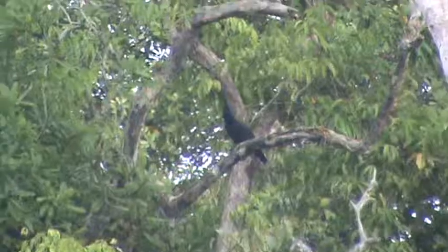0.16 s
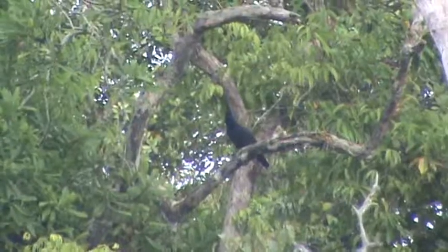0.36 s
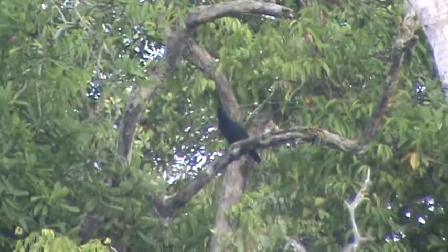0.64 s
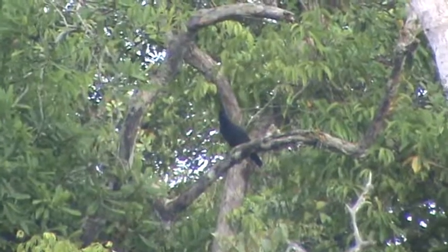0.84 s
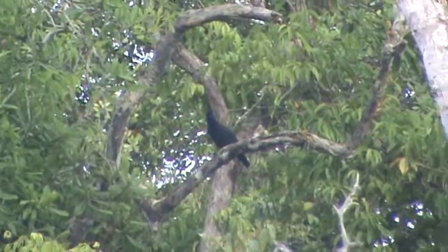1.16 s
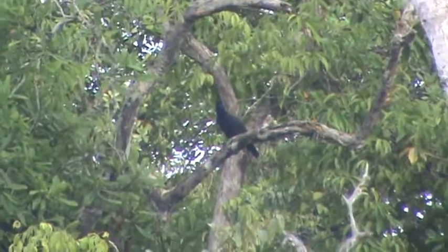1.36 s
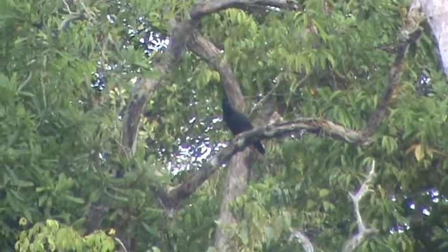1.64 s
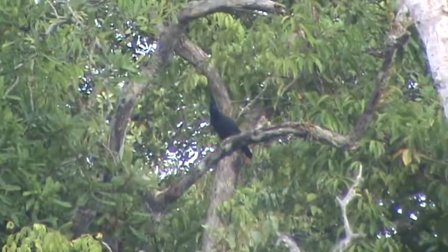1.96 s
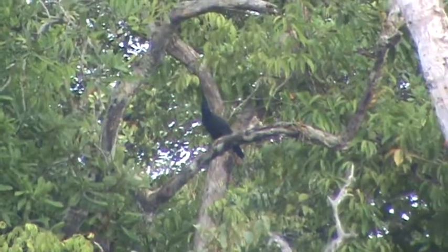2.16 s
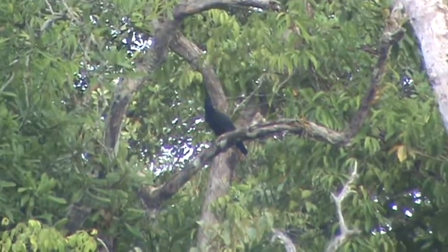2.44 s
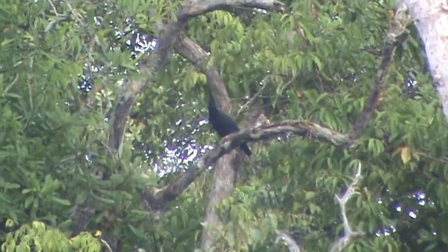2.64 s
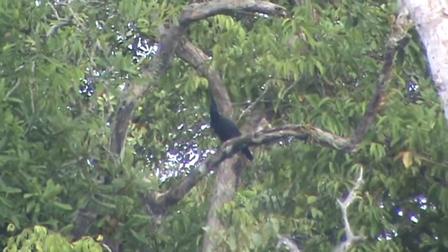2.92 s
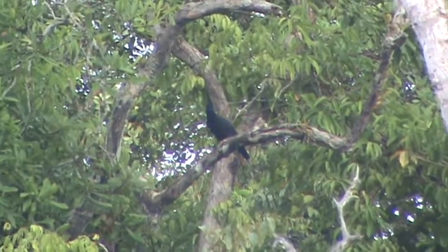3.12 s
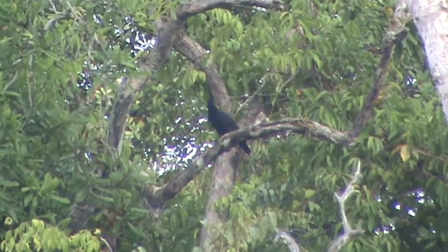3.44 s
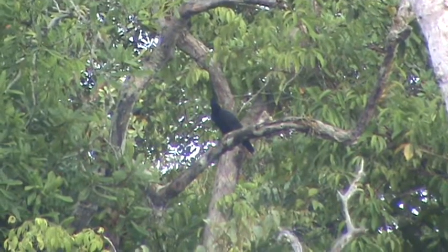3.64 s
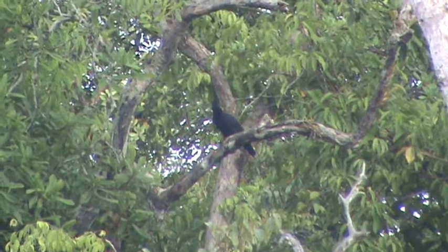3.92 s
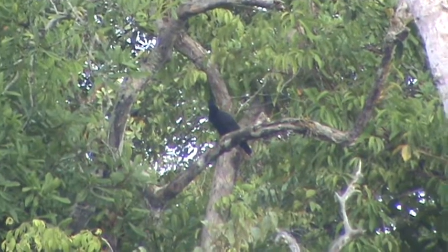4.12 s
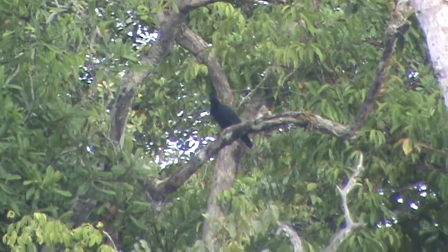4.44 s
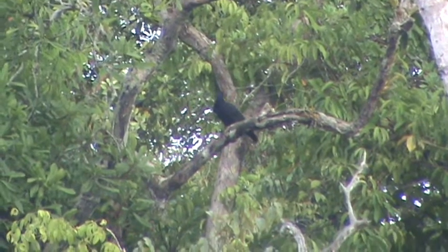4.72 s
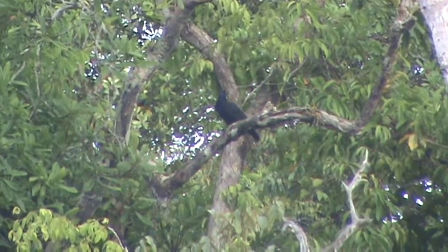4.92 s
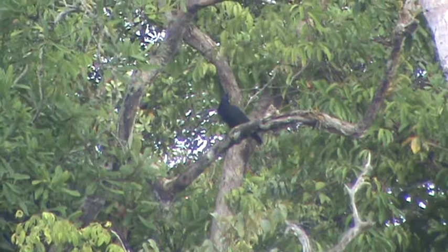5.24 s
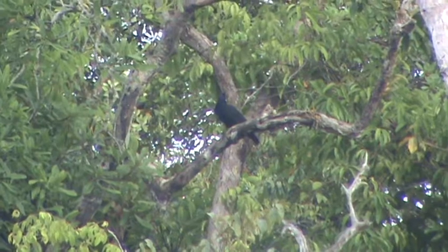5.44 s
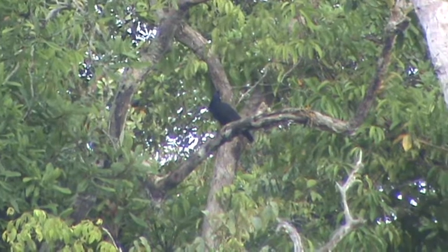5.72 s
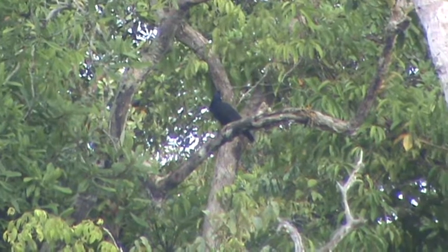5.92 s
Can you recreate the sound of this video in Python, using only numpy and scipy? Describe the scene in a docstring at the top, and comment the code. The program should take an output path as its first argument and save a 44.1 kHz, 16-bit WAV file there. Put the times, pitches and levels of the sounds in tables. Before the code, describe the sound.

Throughout about six seconds, a rainforest rings with a bright, steady cicada drone around five to seven kilohertz, swelling slightly. One cicada throbs about every 0.7 seconds; softer crickets and a low rasp lie beneath, with air hiss and a faint far engine hum. After a tiny silent start, the tail of a soft hoot is heard. Close dry twigs tick irregularly, with a stronger snap near 1.0, and leaves crunch at 1.3, 2.0 and 2.6, ending in a cluster of knocks around 2.8. Faint whistles slide far off. At about 2.7 to 3.4 a dove-like hoot climbs in stutters and falls clearly, overlapping a short frog trill at 2.9. A small twig click comes at 3.8. Small-bird chips begin at 3.1, grow frequent after 4.3, brightest near 5.0, and crowd the end. Another frog trill sounds at 5.4, and a new hoot rises from 5.7. Tree reverberation surrounds the distant voices.

```python
"""In a rainforest by day, on a stereo microphone: cicadas, crickets and a low rasp are trains of short rings,
with one cicada throbbing in repeated phrases. A dove-like bird hoots, a small bird chips, faint whistles slide
and a frog trills, all as gliding sines; trunks and leaves scatter these far voices as noise tails.
Close by, twigs tick as bundles of fading modes and leaves rustle as dense coloured crackles.
A far engine hums as wavering multiples of its shaft rate under the hiss of the air, which is shaped noise."""
import sys
import numpy as np
from scipy import signal
from scipy.fft import rfft, irfft, next_fast_len
from scipy.io import wavfile
from scipy.ndimage import uniform_filter1d

SR = 44100
rng = np.random.default_rng(int(sys.argv[2]) if len(sys.argv) > 2 else 0)


def transcribe(signal):
    """Save signal, clipped to [-1, 1], as a 16-bit WAV file at the path in sys.argv[1]."""
    frames = np.atleast_2d(signal).T
    limited = np.clip(frames, -1, 1)
    pcm = np.round(limited * 32767).astype(np.int16)
    wavfile.write(sys.argv[1], SR, pcm)


N = 267863
T = np.arange(N) / SR
M = next_fast_len(N)  # transform length

# far hiss of the air: (frequency [Hz], density [dB per Hz])
AIR_SPECTRUM = [(20, -80), (40, -91), (100, -78), (220, -86), (280, -93.5), (370, -88.5), (500, -92),
                (800, -86.5), (1450, -91.5), (1800, -94.5), (2300, -93), (3700, -100), (8000, -106),
                (10000, -105), (12500, -104), (16000, -107)]
# microphone ports in a diffuse field:
# (frequency [Hz], likeness [0-1], phase of left [rad], left minus right [dB])
MIC_PORTS = [(40, 0.94, 0.048, -0.5), (131.22, 1, -0.041, -1), (296, 0.6, -0.76, -0.5), (490, 0.6, -1.7, 0),
             (1052.3, 0.64, -2.2, -1.5), (1900, 0.34, -1.8382, -0.5), (3480, 0.3, -1.5, -0.5),
             (6200, 0.97, 0.225, -4), (9600, 0.72, -0.19, 1.5), (13100, 0.94, -0.4, 0.5)]
# far engine, with one row (2.65, near 70 Hz) adding a low tone between its multiples: (multiple of the shaft
# rate [1], # mean level [dB])
ENGINE_HARMONICS = [(1.5, -67), (2, -65), (2.65, -67), (3, -78.5), (4, -55.5), (5, -70.5), (6, -68.5),
                    (7, -73), (8, -68.5), (9, -65), (10, -80)]
# steady cicadas, near and far: (click rate [1/s], ring [Hz], pitch scatter [Hz], time to ring's peak [ms],
# phase roughness [rad], overtone [dB], level before the swell [dB], left minus right [dB])
CICADA_VOICES = [(73.47, 6520, 47.6, 1.75, 2.5164, -44.5, -46, 1),
                 (90.4, 6270, 29, 5.573, 1.3, -24, -55.5, 6.5),
                 (101, 6150, 51, 1.3, 2.899, -40, -53.5, 2.5), (111.9, 7000, 111.1, 1.04, 2.5, -40, -63, 1)]
# cicada chorus: (lowest ring [Hz], highest ring [Hz], mean click rate [1/s], pitch scatter [Hz],
# time to ring's peak [ms], level before the swell [dB], mean left minus right [dB])
CICADA_CHORUS = (5325, 5924, 105, 97, 1.25, -50, -4.5)
# slow swell of the steady cicadas and the chorus: (time [s], gain [dB])
CICADA_SWELL = [(0, -1), (2, -0.5), (6.07, 1)]
# phrases of the throbbing cicada: (first start [s], period [s], sung length [s], edge [s])
CICADA_PHRASE = (.4, .687, .48, .05)
# cricket phrases that rise in pitch:
# (first start [s], period [s], settled pitch [Hz], start below it [Hz], rise time [s], mean level [dB])
RISING_CRICKET = (.1, 1.2, 4270, 250, .25, -72)
# faint low insect rasping in uneven bursts: (click rate [1/s], ring [Hz], pitch scatter [Hz],
# time to ring's peak [ms], burst rate [1/s], burst depth [dB], mean level [dB])
RASPING_INSECT = (54.5, 1462, 59, 2.5, 14, 8, -78)
# low cricket, chirping evenly: (time [s], level before the beat [dB])
LOW_CRICKET = [(0, -74.5), (3, -81.5), (4, -68), (6.07, -69.5)]
# leaves stirring between steps: (time [s], level [dB], brightness [dB])
LEAF_STIR = [(0, -59, -4.5), (1.2, -59, -2.5), (2.5, -58, 1.5), (2.8, -57, -6), (2.95, -101, -3),
             (4.1, -59.5, -7.5), (6.07, -64.5, 6)]
# leaves crushed by a step: (start [s], hold [s], level [dB], starting brightness [dB])
LEAF_STEPS = [(1.332, 0.055, -47.5, -0.5), (2.031, 0.04428, -47.5, -8), (2.632, 0.011, -55.5, -16),
              (2.731, 0.01, -67, -18), (2.81, 0.02102, -49, -9.5), (2.831, .006, -51, 3),
              (3.77, .03, -69, 11.5)]
# colour of dry leaves: (frequency [Hz], relative response [dB])
LEAF_COLOUR = [(120, -19), (320, -6), (700, -10.5), (1500, -11.5), (3000, -13), (6000, -19.5),
               (10000, -23.5), (16000, -48.5)]
# twig ticks and knocks: (time [s], peak [dB], crack centre [Hz], body centre [Hz],
# body against crack [dB], left minus right [dB])
TWIG_TICKS = [(0.1086, -41, 1300, 500, -3, 0), (0.174, -32, 2251, 905.7, -1, -13),
              (0.1735, -42, 4800, 4200, -3, -6.5), (0.1775, -33.5, 1790, 800, 2, 19),
              (0.4214, -44.5, 2800, 500, -17, -2), (0.4352, -36.5, 2600, 900, 6, -6),
              (0.4918, -39, 2800, 1500, -1, -3.5), (0.794, -37, 2400, 800, 2, 5),
              (0.825, -41, 1958, 500, -4, -9), (0.9835, -27, 2230, 447, 4, 3),
              (1.0171, -36, 3380, 700, -3, -1.5), (1.0822, -40.5, 900, 500, -10, -2.4412),
              (1.4603, -37.5, 1400, 700, -1, -6), (1.628, -38, 2024, 612, -1, .1),
              (1.766, -45.5, 700, 300, 4, -3.5), (1.9674, -30, 1812, 301.1, -0.5, 2),
              (2.0492, -38, 1290, 500, -6, -5), (2.074, -42, 500, 260, -2, 0),
              (2.274, -39.5, 909, 450, 1, -5), (2.5807, -44.5, 1000, 400, -5, -4.5),
              (2.648, -44, 704, 400, 4, -5), (2.658, -40, 2400, 500, -20, 1),
              (2.67, -43.5, 2500, 500, -18, 1), (2.705, -46, 900, 447, 3, -5),
              (2.736, -44, 600, 300, 4, -2), (2.748, -44, 1100, 400, -4.5, -2),
              (2.756, -46, 500, 280, 4, -2), (2.8242, -38, 420, 300, 14, 0.5),
              (2.831, -38, 922.3, 354.2, 0, -2.5), (2.8414, -29.5, 3300, 230, -2.5, -6),
              (2.8442, -33.5, 2200, 815, -1, 10), (2.857, -40, 900, 350, 5.5, 0),
              (3.758, -34.5, 2100, 1070, -3, 3), (3.763, -38, 2400, 1200, 3, 7),
              (5.4917, -41, 3700, 500, -20, 3)]
# small ticks at random between the loud ones: (latest time [s], mean peak [dB], peak scatter [dB],
# crack centre [Hz], body centre [Hz], body against crack [dB], left minus right [dB])
SMALL_TWIG_TICKS = (3.5, -48, 2, 1800, 600, -7, 8)
# modes of a twig before detuning: (frequency [Hz], time to fall 60 dB [s])
TWIG_MODES = [(215, .032), (285, .03), (400, .024), (540, .021), (760, .02), (1020, .017), (1320, .014),
              (1650, .012), (2000, .013), (2350, .014), (2820, .012), (3500, .011), (4200, .008),
              (4900, .007), (7800, .004)]
# hoots: (time of the turn [s], level [dB])
HOOT_TIMES = [(.117, -48.5), (3.02, -46.5), (6.07, -51)]
# one hoot, a stuttering climb and a clear fall:
# (time from the turn [s], pitch [Hz], relative level [dB], flutter [0-1, clipped above])
HOOT_SHAPE = [(-.36, 600, -26, .9), (-.16, 770, -10, .9), (-.06, 825, -6, 1.15), (0, 845, -4.5, 0.65),
              (.06, 814, -3, 0.08), (.14, 790, -4.5, 0.2), (.23, 757, -5.5, 0.31), (.31, 700, -9.5, 0),
              (.37, 635, -23, .1)]
# fainter whistles and slides further off:
# (start [s], length [s], first pitch [Hz], last pitch [Hz], level before hoarseness [dB])
FAR_WHISTLES = [(.318, 0.013, 2390, 2380, -59), (0.373, .01, 1780, 1740, -61),
                (0.599, .012, 2340, 2350, -62), (0.679, .012, 2450, 2400, -62),
                (0.734, .008, 1900, 1850, -61), (2.565, .014, 2750, 2600, -60),
                (2.637, 0.013, 2300, 2380, -60), (0.603, 0.16, 870, 795, -66),
                (1.824, 0.042, 1200, 2340, -63.5), (2.141, 0.32, 1010, 878, -64),
                (2.654, .02, 2217, 2146, -56.5), (2.764, .054, 2400, 1460, -60.5),
                (3.318, 0.12, 920, 966, -62), (5.486, 0.012, 3900, 3500, -61)]
# frog trills: (first pulse [s], last pulse [s], pulse rate [1/s], mean pitch [Hz], starting level [dB])
FROG_TRILLS = [(2.863, 3.225, 31.6, 1980, -55.5), (5.362, 5.66, 31.4, 1960, -56.5),
               (3.838, 3.85, 31.5, 2010, -56), (4.873, 4.885, 31.5, 2070, -54)]
# small bird: (time of the top [s], top pitch [Hz], end pitch [Hz], level before hoarseness [dB])
BIRD_CHIPS = [(3.102, 2764, 1877, -52), (3.785, 2350, 2010, -60), (3.94, 2250, 2100, -57.5),
              (4.345, 2787, 1810, -49.5), (4.603, 2355, 2010, -51), (4.712, 2874, 2620, -50.5),
              (4.965, 3413, 1780, -45), (5.18, 2420, 2010, -53), (5.205, 2300, 1900, -54.5),
              (5.235, 2690, 1990, -57), (5.409, 2400, 2360, -51), (5.507, 3210, 2730, -50),
              (5.691, 2400, 2200, -51), (5.717, 2400, 1970, -51.5), (5.765, 2450, 1979, -59),
              (5.985, 2350, 2050, -59), (5.743, 2840, 1900, -55), (5.931, 2435, 2300, -50),
              (6.018, 3410, 1508, -48), (6.075, 3300, 2500, -53)]

ENGINE_HZ = 26.49  # mean shaft rate
PHRASE_DB, PHRASE_WANDER_DB = -56.5, -0.3014  # throbbing cicada
LEAVES_SIDE_DB = -3.5  # left minus right: the leaves lie to the right
STEP_ATTACK_S, STEP_FADE_DB_S, STEP_DULLS_DB_S = 0.0034, 180, 51.5
# twig modes fall off with the square of their octaves from a centre; SNAP_MS is the attack
CRACK_DB_OCT2, BODY_DB_OCT2, SNAP_MS = 23.5, 23, 0.5875
HOARSE_DB = 2  # random level flicker of chips and whistles
# a trill tires; each pulse bends up by the sweep share and fills the width share of a beat
TRILL_FADE_DB_S, TRILL_SWEEP, TRILL_WIDTH = 7, .14, .19
CHIP_START_HZ, CHIP_SIDE_DB = 1692, 0.5
# a fall of 1 kHz takes the glide time, wider ones go with the root; the rise takes a share; the top holds
GLIDE_MS_PER_ROOT_KHZ, RISE_SHARE, HOLD_MS = 22, 0.55, 5.5
RISE_UNDER_DB, FALL_UNDER_DB = 13, 4  # foot of the rise and end of the fall, below the top
ECHO_S, ECHO_DB = .015, -7  # a trunk behind the perch throws each chip back
NEAR_T60_S, NEAR_DB = .15, -4  # scatter off the leaves round the perch
FOREST_T60_S, FOREST_LIKE = 0.96, 0.67065  # scatter by the trees; likeness of the sides [0-1]
INSECT_WET_DB, BIRD_WET_DB, HOOT_WET_DB = 1, -3, -15  # tails; the last serves whistles, trills and hoots
START_S, TOP_HZ = 0.041503, 15750


def undb(db):
    """Gain of a level in dB."""
    return 10 ** (np.asarray(db) / 20)


def level(x, db):
    """Set the rms."""
    return x * undb(db) / np.sqrt(np.mean(x ** 2))


def curves(rows):
    """Columns of a table at every sample."""
    s, *columns = np.transpose(rows)
    return [np.interp(T, s, c) for c in columns]


def on_bins(rows, column=1):
    """A column of a frequency table at every transform bin, on a log axis."""
    rows = np.array(rows)
    bin_hz = np.arange(M // 2 + 1) * SR / M
    return np.interp(np.log(bin_hz + 1), np.log(rows[:, 0]), rows[:, column])


def pan(x, db):
    """Two channels, left louder by db."""
    return x * undb(np.array([[db], [-db]]) / 2)


def walk(rate):
    """Random levels held 1 / rate s and slewed twice; spread near 1."""
    k = int(SR / rate)
    held = np.repeat(rng.standard_normal(N // k + 1), k)
    return 1.3 * uniform_filter1d(uniform_filter1d(held, k), k)[:N]


def ports(x, other):
    """Sound from all round: the right port hears part of x, shifted in phase, and part of an unrelated twin."""
    like = np.clip(on_bins(MIC_PORTS), 0, 1)
    shared = like * np.exp(-1j * on_bins(MIC_PORTS, column=2)) * rfft(x, M)
    right = shared + np.sqrt(1 - like ** 2) * rfft(other, M)
    return np.array([x, irfft(right * undb(-on_bins(MIC_PORTS, column=3)), M)[:N]])


def air():
    """Octave bands of far hiss that swell together and flicker alone."""
    spectrum = rfft(rng.standard_normal((2, M))) * undb(on_bins(AIR_SPECTRUM)) * np.sqrt(SR / 2)
    octave = np.log2(np.arange(M // 2 + 1) * SR / M + 1)
    swell, out = walk(1.35), 0
    for centre in range(4, 16):
        band = np.cos(np.pi / 2 * np.clip(octave - centre, -1, 1)) ** 2
        out = out + irfft(spectrum * band, M)[:, :N] * undb(0.64 * swell + 2.096 * walk(9))
    return ports(*out)


def engine(lag_ms=0.43):
    """Multiples of the shaft rate, each wavering in level; the sound reaches the right port first."""
    turn = np.cumsum(ENGINE_HZ * (1 + 0.00395 * walk(1.995))) / SR
    turns = turn + np.array([[0], [ENGINE_HZ * lag_ms / 1000]])
    out = 0
    for k, db in ENGINE_HARMONICS:
        gain = np.sqrt(2) * undb(db + 2.7 * walk(9))
        out = out + gain * np.sin(2 * np.pi * (k * turns + rng.random()))
    return out


def forest(x, wet_db, sway, count=3):
    """Trunks and leaves scatter a far sound: noise tails, whose mix shifts at even power as the leaves sway."""
    t, wet, like, lean = T[:SR // 2], 0, np.clip(FOREST_LIKE, 0, 1), sway * walk(3.983)
    for k in range(count):
        decay = undb(-60 * t / FOREST_T60_S) * np.minimum(t / 0.003, 1)
        mid, side = rng.standard_normal((2, len(t))) * decay
        tail = np.sqrt(1 + like) * mid + np.sqrt(1 - like) * side * np.array([[1], [-1]])
        tail = tail / np.sqrt(np.mean(tail ** 2) * len(t))  # unit energy
        path = x.mean(axis=0, keepdims=True) * np.cos(np.pi * k / count + lean)
        wet = wet + signal.oaconvolve(path, tail, axes=1)[:, :N]
    return x + wet * undb(wet_db) * np.sqrt(2 / count)


def sing(rate, hz, scatter_hz, ring_ms, rough, overtone_db=-40, drift=.0012, scatter_db=1.5):
    """Each click restarts a short ring; pitch, phase and size differ from click to click. Rms 1."""
    cycles = np.cumsum(rate * (1 + drift * walk(3))) / SR + rng.random()
    chance = rng.standard_normal((1200, 3))[cycles.astype(int)].T  # one draw a click
    age = cycles % 1 / rate
    swell = age / (ring_ms / 1000)
    phase = 2 * np.pi * (hz + scatter_hz * chance[0]) * age + rough * chance[1]
    ring = np.sin(phase) + undb(overtone_db) * np.sin(2 * phase)
    return level(swell * np.exp(-swell) * ring * undb(scatter_db * chance[2]), 0)


def cicadas(count=12):
    """Steady click trains near and far, and a chorus of voices spread in pitch, swelling slowly together."""
    out = sum(pan(undb(db) * sing(*voice), side_db) for *voice, db, side_db in CICADA_VOICES)
    low_hz, high_hz, rate, scatter_hz, ring_ms, db, side_db = CICADA_CHORUS
    for k, hz in enumerate(np.linspace(low_hz, high_hz, count)):
        own_rate = rate * (1 + .12 * rng.standard_normal())
        voice = sing(own_rate, hz, scatter_hz, ring_ms, 3.34) * undb(0.35 * walk(4.27))
        out = out + pan(voice * undb(db) / np.sqrt(count), side_db + 3.4 * (-1) ** k)
    return out * undb(curves(CICADA_SWELL)[0])


def throbbing_cicada():
    """A cleaner-voiced click train, with little scatter of pitch and phase, repeats one phrase."""
    first, period, sung, edge = CICADA_PHRASE
    age = (T - first) % period
    gate = np.clip(np.minimum(age, sung - age) / edge, 0, 1)
    phrase = gate * undb(PHRASE_DB + PHRASE_WANDER_DB * walk(0.55))
    return pan(sing(94.49, 5855, 9, 4.5, .5, scatter_db=.8) * phrase, -.4)


def rising_cricket():
    """A click train whose ring climbs to a settled pitch in each phrase."""
    first, period, hz, below_hz, rise, db = RISING_CRICKET
    age = (T - first) % period
    voiced = np.clip(np.minimum(age, period - .12 - age) / 0.0094, .3, 1)  # it falters between phrases
    voice = sing(76.4, hz - below_hz * np.exp(-age / rise), 70, 1.6, 2.5, scatter_db=2.5)
    return pan(voice * voiced * undb(db + 3.2 * walk(5.77)), 0.22)


def rasp():
    """A low click train whose level jumps about in uneven bursts."""
    rate, hz, scatter_hz, ring_ms, bursts, depth_db, db = RASPING_INSECT
    return pan(sing(rate, hz, scatter_hz, ring_ms, 2.17) * undb(db + depth_db * walk(bursts)), -1.5)


def low_cricket():
    """A click train opened by the upper half of a slow cosine."""
    beat = np.maximum(np.cos(2 * np.pi * (T - 4.635) / .288), 0) ** 0.38  # one chirp a beat
    return pan(sing(60, 3217, 24.51, 3.376, 1.4526) * beat * undb(curves(LOW_CRICKET)[0]), .3)


def rustle(per_s=1500, spread_db=2.0, tilt_hz=1000):
    """Dense crackles of uneven size coloured by dry leaves; a step starts bright and dulls as it fades."""
    db, bright_db = curves(LEAF_STIR)
    low_gain, high_gain = undb(db), undb(db + bright_db)
    for s, hold, step_db, step_bright_db in LEAF_STEPS:
        age = T - s
        fade = undb(step_db - STEP_FADE_DB_S * np.maximum(age - hold, 0))
        gain = np.clip(age / STEP_ATTACK_S, 0, 1) * fade
        low_gain = low_gain + gain
        high_gain = high_gain + gain * undb(step_bright_db - STEP_DULLS_DB_S * np.maximum(age, 0))
    grains = (rng.random((2, N)) < per_s / SR) * rng.standard_normal((2, N))
    grains = grains * undb(spread_db * np.minimum(rng.exponential(size=(2, N)), 3.2))
    leaves = irfft(rfft(grains, M) * undb(on_bins(LEAF_COLOUR)), M)[:, :N]
    high = signal.sosfilt(signal.butter(2, tilt_hz, "high", fs=SR, output="sos"), leaves)
    leaves = ((leaves - high) * low_gain + high * high_gain) / np.sqrt(np.mean(leaves ** 2))
    return pan(ports(*leaves), LEAVES_SIDE_DB)


def hoots(flutter_hz=46.5, last_gap_s=-.011):
    """Near-sine whistles; the rising part of the hoot stutters."""
    out = 0
    for turn, loud_db in HOOT_TIMES:
        hz, db, flutter = curves(np.add(HOOT_SHAPE, (turn, 0, loud_db, 0)))
        inside = uniform_filter1d(1. * (abs(T - turn) < HOOT_SHAPE[-1][0]), size=400)
        gaps = (1 + np.cos(2 * np.pi * flutter_hz * (T - turn - last_gap_s))) / 2
        stutter = 1 - np.clip(flutter, 0, 1) * gaps
        out = out + np.sqrt(2) * undb(db) * inside * stutter * np.sin(2 * np.pi * np.cumsum(hz) / SR)
    return pan(out, 0.43)


def ticks(count=8):
    """Every snap rings the same modes, slightly detuned: those round its crack and those round its body."""
    out, t = np.zeros((2, N + SR)), T[:SR // 16, None]
    hz, t60 = np.transpose(TWIG_MODES)
    until, peak_db, scatter_db, *colour = SMALL_TWIG_TICKS
    small = [(until * u, peak_db + scatter_db * (2 * v - 1), *colour) for u, v in rng.random((count, 2))]
    for s, db, crack_hz, body_hz, body_db, side_db in TWIG_TICKS + small:
        chance = rng.standard_normal((2, len(TWIG_MODES)))
        crack = undb(-CRACK_DB_OCT2 * np.log2(hz / crack_hz) ** 2)
        body = undb(body_db - BODY_DB_OCT2 * np.log2(hz / body_hz) ** 2)
        gain = (crack + body) * undb(2.0 * chance[0])
        gain = gain * (-1) ** np.arange(len(TWIG_MODES))  # neighbours swing against each other
        ring = gain * undb(-60 * t / t60) * np.sin(2 * np.pi * hz * (1 + 0.03 * chance[1]) * t)
        snap = ring.sum(axis=1) * np.minimum(t[:, 0] * 1000 / SNAP_MS, 1)
        at = int(s * SR)
        out[:, at:at + len(t)] += pan(snap * undb(db) / abs(snap).max(), side_db)
    return out[:, :N]


def foliage(x, count=2):
    """Leaves near a singer smear each note with a short dense tail that changes as they tremble."""
    t, lean, out = T[:SR // 5], 2.5 * walk(30), x
    for k in range(count):
        decay = undb(-60 * t / NEAR_T60_S) * np.minimum(t / 0.0019, 1)
        tail = rng.standard_normal((2, len(t))) * decay
        tail = tail / np.sqrt(np.mean(tail ** 2) * len(t))
        path = x * np.cos(np.pi * k / count + lean)
        out = out + undb(NEAR_DB) * signal.oaconvolve(path, tail, axes=1)[:, :N]
    return out


def whistles():
    """Faint, hoarse sine glides."""
    out = 0
    for s, length, first_hz, last_hz, db in FAR_WHISTLES:
        way = np.clip((T - s) / length, 0, 1)
        hz = first_hz + (last_hz - first_hz) * way ** 0.618
        swell = np.sqrt(4 * way * (1 - way))
        out = out + np.sqrt(2) * undb(db) * swell * np.sin(2 * np.pi * np.cumsum(hz) / SR)
    return pan(out * undb(HOARSE_DB * walk(150)), .4)


def frog():
    """Trains of short rising pulses that waver in pitch and size."""
    out = 0
    for first, last, rate, hz, db in FROG_TRILLS:
        place = ((T - first) * rate + .05 * walk(20) + .5) % 1 - .5  # in beats from the pulse's middle
        inside = (T > first - .5 / rate) & (T < last + .5 / rate)
        size = undb(db - TRILL_FADE_DB_S * np.clip(T - first, 0, 1) + 2.78 * walk(25.0))
        size = size * np.exp(-(place / TRILL_WIDTH) ** 2)
        pitch = hz * (1 + TRILL_SWEEP * place + 0.0098 * walk(25))
        out = out + inside * size * np.sin(2 * np.pi * np.cumsum(pitch) / SR)
    return pan(out, .2)


def chips(rough_hz=210):
    """Quick up-and-down whistles, loudest at the turn, hoarse, each with one echo."""
    out = np.zeros((2, N + SR))
    for s, top_hz, end_hz, db in BIRD_CHIPS:
        spans_khz = (top_hz - np.array([CHIP_START_HZ, end_hz])) / 1000
        rise_ms, fall_ms = GLIDE_MS_PER_ROOT_KHZ * np.sqrt(spans_khz)
        rise_ms = RISE_SHARE * rise_ms
        ms = np.arange(-rise_ms - HOLD_MS, fall_ms, 1000 / SR)
        # 0 at the top, 1 at either end
        way = np.where(ms < 0, np.clip(-(ms + HOLD_MS) / rise_ms, 0, 1), ms / fall_ms)
        hz = top_hz + (np.where(ms < 0, CHIP_START_HZ, end_hz) - top_hz) * way ** 1.15
        jitter = np.interp(ms, np.arange(-40, 60, 2), rng.standard_normal(50))
        hz = hz + rough_hz * (way + .12) * jitter
        gain = undb(db - np.where(ms < 0, RISE_UNDER_DB, FALL_UNDER_DB) * way) * np.sqrt(1 - way ** 4)
        note = gain * np.sin(2 * np.pi * np.cumsum(hz) / SR)
        at = int((s - (rise_ms + HOLD_MS) / 1000) * SR)
        out[:, at:at + len(ms)] += pan(note, CHIP_SIDE_DB)
    lag = int(ECHO_S * SR)
    out[:, lag:] += undb(ECHO_DB) * out[:, :-lag]
    return out[:, :N] * undb(HOARSE_DB * walk(300))


def scene():
    """Far voices pass through the forest; twigs and leaves are close."""
    insects = cicadas() + throbbing_cicada() + rising_cricket() + rasp() + low_cricket()
    far = forest(insects, INSECT_WET_DB, sway=0.69)
    far = far + forest(foliage(chips()), BIRD_WET_DB, sway=0.53)
    far = far + forest(foliage(whistles()) + frog() + hoots(), HOOT_WET_DB, sway=0.55)
    return far + ticks() + rustle() + engine() + air()


def record(dry):
    """The sound fades in quickly after a short silence; the top is cut."""
    fade = np.clip((T - START_S) / 0.02, 0, 1)
    low_pass = signal.ellip(10, .2, 60, TOP_HZ, fs=SR, output="sos")
    return signal.sosfilt(low_pass, dry * fade)


dry = scene()
out = record(dry)
transcribe(out)
```